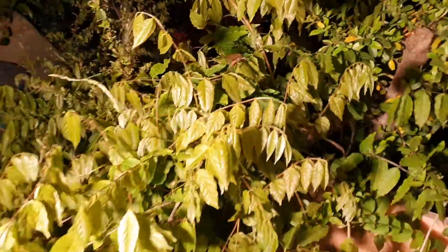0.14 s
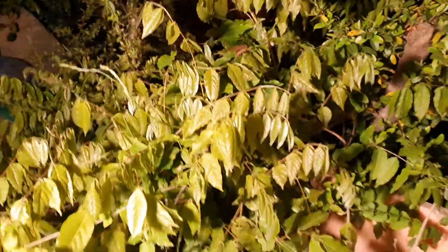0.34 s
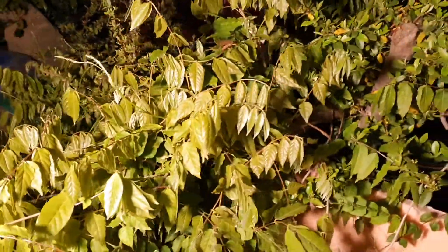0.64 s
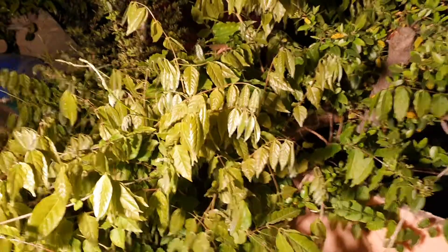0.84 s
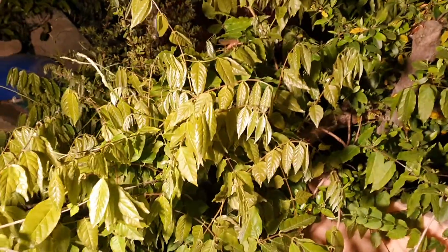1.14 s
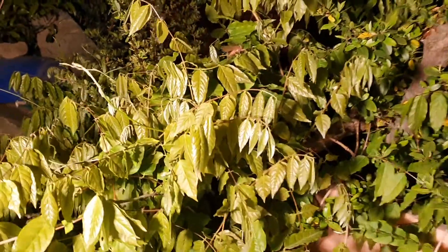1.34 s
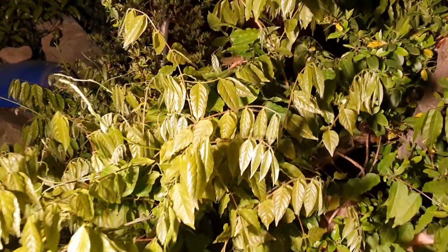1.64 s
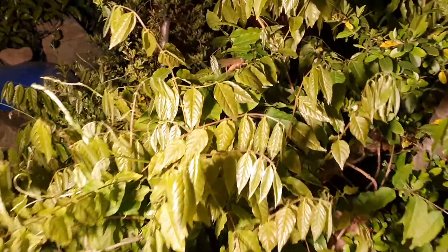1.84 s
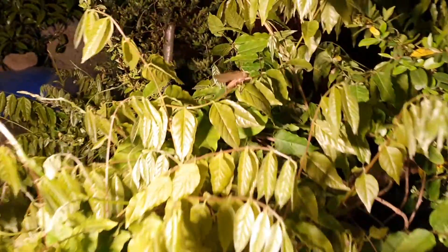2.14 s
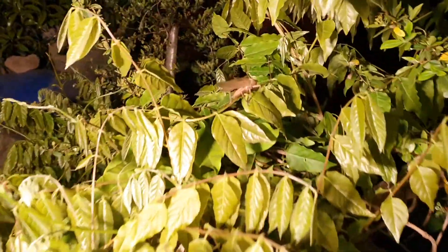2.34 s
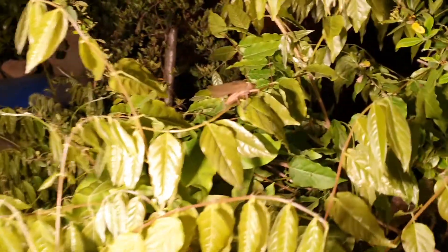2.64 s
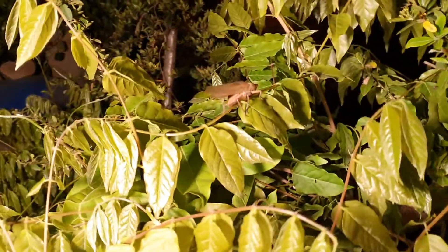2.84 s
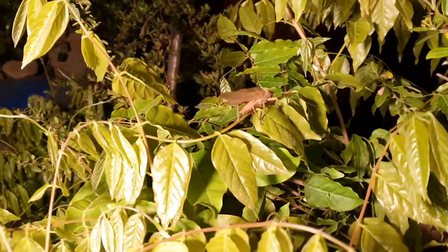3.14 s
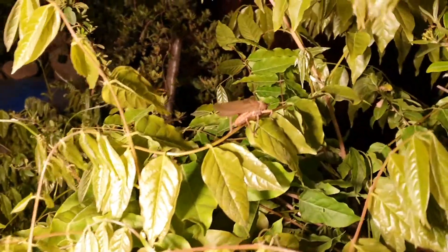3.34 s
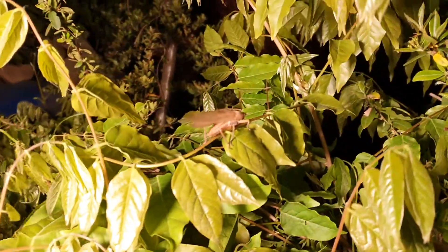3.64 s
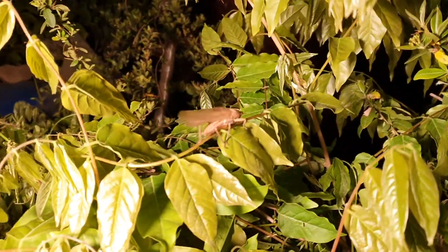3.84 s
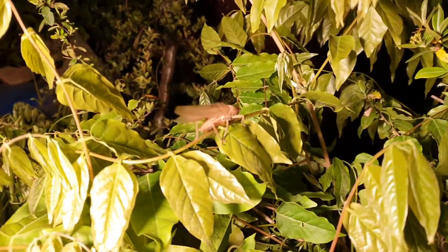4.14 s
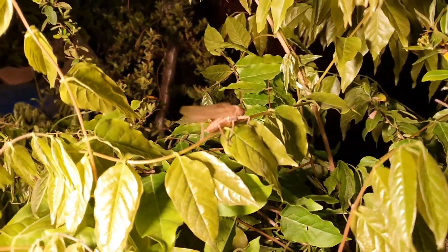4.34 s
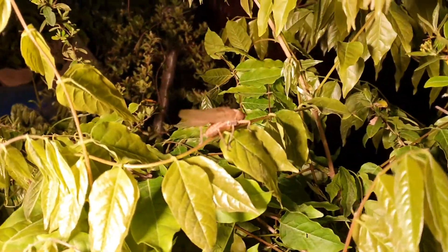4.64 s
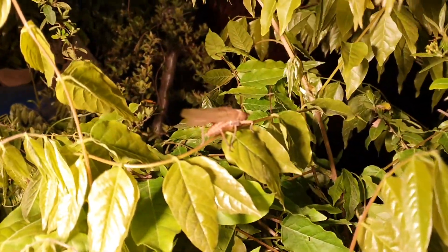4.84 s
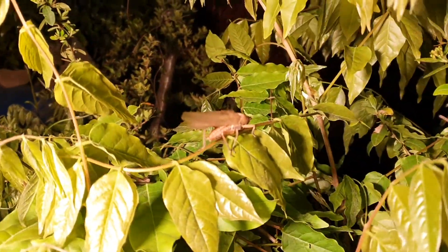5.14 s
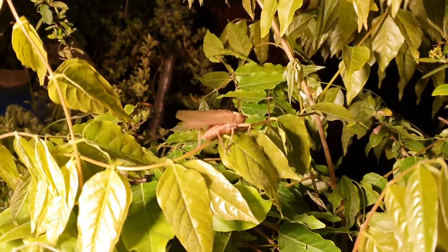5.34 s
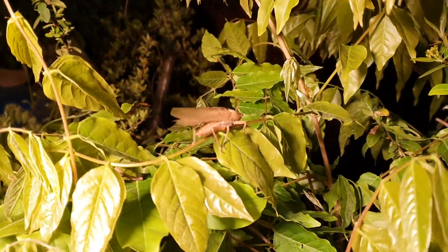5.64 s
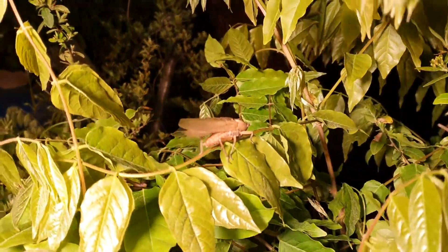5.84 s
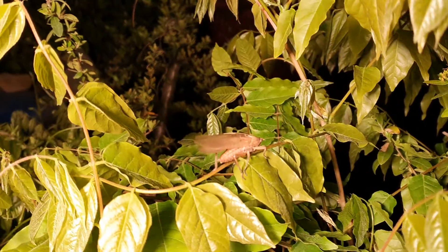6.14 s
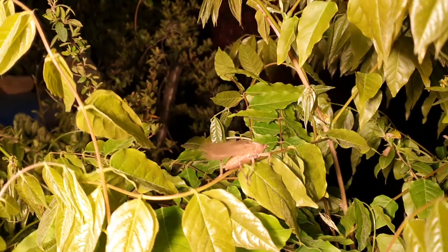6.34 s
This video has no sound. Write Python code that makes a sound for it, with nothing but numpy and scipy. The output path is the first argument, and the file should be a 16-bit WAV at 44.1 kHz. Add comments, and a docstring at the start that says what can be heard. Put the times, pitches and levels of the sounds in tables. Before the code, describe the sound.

Outdoors at night, a katydid in a leafy bush sings one unbroken, very high, sizzling buzz, its strokes so rapid they blur into a rough whine. The stereo microphone moves closer early on, and the sound shifts slightly to the left as leaves tint its brightness. Just after five seconds it stops instantly, leaving a quiet low traffic rumble, far engine hum and faint insect hiss.

```python
"""A katydid buzzes in a leafy bush at night while a camera moves closer; the buzz then ends abruptly.
Each wing stroke drags a scraper along a toothed file: a few slips over the first half of a falling
chirp, whose octave rings the wing. The wingbeat hums softly; leaves scatter and shade the buzz. Behind
it distant traffic and engines murmur, far insects hiss, and a few dry ticks and a crackle are heard."""
import sys
import numpy as np
from scipy import signal
from scipy.fft import rfft, irfft, next_fast_len
from scipy.io import wavfile
from scipy.ndimage import uniform_filter1d, minimum_filter1d, map_coordinates

SR = 44100
rng = np.random.default_rng(int(sys.argv[2]) if len(sys.argv) > 2 else 0)


def put_to_file(sound):
    """Save the sound as 16-bit audio at rate SR, in the file named by the first command-line argument."""
    columns = np.atleast_2d(sound).T  # one column per channel
    safe = np.clip(columns, -1, 1)
    whole_steps = np.round(safe * 32767)
    wavfile.write(sys.argv[1], SR, whole_steps.astype(np.int16))


N = 286209
T_S = np.arange(N) / SR

# Wingbeat tempo. Each row: time in seconds, strokes per second.
TEMPO = [(0, 91.43), (2.5, 91.5), (3.2, 91.25), (4.3, 91.38), (5.17, 91.68)]
LAST_STROKE_S = 5.1642
# Strokes before STUMBLE_S start this much later: the rhythm skips ahead once.
STUMBLE_S, STUMBLE_SHIFT_S = .86, .0016
# Scraper slips, from before the bite to mid-chirp. Each row: time in ms, relative level in dB,
# timing spread in ms.
SLIPS = [(.76, -6.5, .003), (1.92, -1.5, .003), (2.7, -3.5, .008), (3.35, -3, .025), (4, -3, .06),
         (4.65, -6.5, .1)]
# Wing modes rung by the slips. Each row: frequency in Hz, relative level in dB, t60 in ms.
WING_MODES = [(9410, -0.5, 2.08), (11390, 4.5, 1.94), (12350, -3.5, 2.5), (13750, -9.5, 2.6),
              (14460, -7, 2.2)]
WING_SWELL_MS = .22
# Wing radiation. Each row: frequency in Hz, gain in dB.
RADIATION = [(5000, -56), (6400, -33), (6900, -3), (7400, 1.5), (7750, 3.5), (8300, 6), (9100, -2),
             (10000, -0.5), (11000, -1.5), (12350, -5), (13000, 1), (13550, -6.5), (14400, -0.5),
             (15250, -2.5), (15750, 2)]
# One closing stroke: the scraper bites, slows along the file and lifts off.
BITE_MS, LIFT_MS, ATTACK_MS, RELEASE_MS = 1.7, 7.7, .3, .8
# Nominal tooth rate at the bite, and time constant of its fall.
FIRST_TOOTH_HZ, SLOWING_MS = 11200, 11.8
# Stroke timing spread; period and depth (0-1) of the scraper's judder.
STROKE_JITTER_MS, JUDDER_PERIOD_MS, JUDDER_DEPTH = .03, 1.25, .3
# The octave swells as it falls through the wing's top resonance.
TONE_DB, OCTAVE_DB, OCTAVE_HZ, OCTAVE_HALF_WIDTH_HZ = -7.5, 3, 14720, 470
# Spread in force of whole strokes and single slips.
STROKE_SPREAD_DB, SLIP_SPREAD_DB = .35, 2.1
# Friction noise of scraper on file. Each row: frequency in Hz, gain in dB.
SCRAPE_COLOUR = [(6500, -4.5), (8500, -0.5), (10500, 7), (13000, 6.5), (15500, 0.5)]
# Weak rasp, late in each stroke, below the song in pitch.
RASP_PEAK_MS, RASP_SLOPE_DB_PER_MS, RASP_SPREAD_DB = 6.4, 4.2, 2.3
RASP_SWING_DB, RASP_SWINGS_PER_S = 1.8, 8
# Rasp colour. Each row: frequency in Hz, gain in dB.
RASP_COLOUR = [(3000, -45), (4300, -19), (4900, -2), (5300, -1), (5600, -2), (6100, -.5), (6450, -7),
               (7500, -40)]
# Rasp level. Each row: time in seconds, mean level against the song in dB.
RASP_DB = [(.3, -40), (1.6, -39), (3.2, -40.5), (4.5, -38.5)]
# Air pushed by the wings. Each row: multiple of the stroke rate, rms level at one metre in dB.
WINGBEAT = [(1, -62), (2, -60.5), (3, -63), (4, -67.5)]

# Song level at one metre, before shading by leaves.
SONG_DB = -11.5
# Camera to singer. Each row: time in seconds, distance in metres.
DISTANCE = [(.1, 2.29), (.6, 1.87), (1.35, 1.53), (2.3, 1.47), (3.6, 1.51)]
# Camera turning. Each row: time in seconds, singer's bearing in degrees to the left.
BEARING = [(.05, 3.2), (.35, 0.54), (.8, 1), (1.4, 0.57), (1.95, 1.7), (2.3, 3.8), (2.5, 7.1), (2.65, 10.7),
           (2.95, 10.9), (3.1, 8.7), (3.3, 10.5), (3.5, 12.9), (3.95, 17.04), (4.75, 18.2), (5.15, 16.9)]
TREMOR_DEGREES, TREMORS_PER_S = .15, 7
PORT_GAP_M, SOUND_M_PER_S = .15, 343
# Lag of right port behind left for sound from the front. Each row: frequency in Hz, phase in radians.
PORT_PHASE = [(5000, 1.5), (6300, 0.8), (7100, 0), (8200, 1.27), (9650, -0.3), (11000, -0.5), (12600, -1.5),
              (13400, -1), (15500, -0.5)]
# Near-leaf echoes, thinning as the view clears. Each row: time in seconds, dB against direct song.
LEAVES_DB = [(0, -1), (1.3, -3.5), (2.3, -5.5), (2.8, -8), (5.15, -7.5)]
LEAVES_T60_S = .032
# Single reflections at the left port. Each row: first delay in ms, last delay in ms, signed share.
LEFT_LEAVES = [(.374, .39, -.16), (.464, .52, -.14), (.678, .766, -.12)]
# The same at the right port. Each row: first delay in ms, last delay in ms, signed share.
RIGHT_LEAVES = [(.39, .382, .16), (.224, .3, -.12), (.75, .674, -.12), (.938, 1.106, -.12)]
# Centres of the song's low, middle and top bands. Each entry: frequency in Hz.
BANDS_HZ = [8000, 10700, 14700]
# Shading by leaves. Each row: time in seconds, low, middle and top band gain in dB.
SHADE = [(0, 1, 1.5, 4), (.5, -0.5, -0.6, 1.5), (1.3, -1, 1, 4), (1.85, -0.5, -0.5, 3), (2.1, 0, -0.5, 2),
         (2.4, -1, -0.5, 2), (2.8, -1.1, 3.5, 1.8), (3.45, -2.04, 4, 3.5), (4.1, -1, 2.5, 3.3),
         (5.15, -1.5, 3, 3.5)]
# Tilt between ports. Each row: time in seconds, left minus right in low, middle and top band in dB.
BALANCE_DB = [(0, 0, 0, -3), (0.5, -2, 0, -1.5), (1.3, -1, -1, -3), (1.75, -0.5, -1, -4),
              (2.1, -2.8, 0.5, -4), (2.4, -2.5, 1, 1), (2.75, -1, -1.5, 4), (3.1, 2.5, -2.5, 2),
              (3.45, 0, -0.5, 2), (3.8, 1, 1, 3), (4.4, -0.3, 3.5, 2.7), (5.15, 1.5, 2, 2.5)]

# Dry ticks. Each row: time in seconds, peak before colouring in dB.
TICKS = [(0.857, -16), (1.582, -24), (4.053, -20), (4.9185, -28), (4.94, -26), (4.962, -26), (4.9735, -26)]
# Soft crackle; its level is before colouring.
CRACKLE_S, CRACKLE_HALF_S, CRACKLE_DB, CRACKLES_PER_S = 4.945, .05, -34, 900
# Colour of ticks and crackle. Each row: frequency in Hz, gain in dB.
TICK_COLOUR = [(400, -8), (1500, -1), (6000, 2), (12000, 0)]

# Distant traffic spectrum. Each row: frequency in Hz, relative density in dB per Hz.
ROAD = [(12, -41.5), (20, -27.5), (36, -8), (53, 2.5), (101, -1.5), (150, -10), (184, -7), (250, -6.5),
        (292, -7), (334, -14.5), (532, -9), (694, -9.5), (1260, -16), (1800, -17.5), (2700, -26.5),
        (4000, -33), (5200, -45), (8800, -120)]
# Steady road levels.
RUMBLE_DB, ROAR_DB, ROAR_FLUTTER_DB = -53, -47, .75
# Swells of the road sound. Each row: loudest at seconds, half length in seconds, rumble in dB, roar in dB.
ROAD_SWELLS = [(0.246, 0.3, -61, -75), (1.542, 0.98, -55.5, -46.5), (2.849, 0.45, -50.5, -51),
               (5.95, 0.25, -51.5, -63), (6.443, 0.12, -46.5, -43)]
# Far engines. Each row: loudest at seconds, half length in seconds, pitch in Hz, glide in Hz per s,
# mean level at the loudest in dB, octave against the tone in dB.
ENGINES = [(0.777, 1, 49.1, 0.4, -51.5, -5), (1.405, 0.72, 310.5, -6, -64, -29),
           (2.933, 0.35, 299.7, -7.5, -48, -23), (3.99, 0.64, 54.16, -2.5, -54, -13),
           (6.151, 0.78, 56.1, 1.2, -48, -4)]
# Far-insect hiss spectrum. Each row: frequency in Hz, relative density in dB per Hz.
NIGHT = [(2500, -31.5), (4000, -25), (5500, -11.5), (7500, -16.5), (8600, -12), (9900, -20), (10700, -5),
         (11500, -2.5), (13200, -9), (14300, -6.5), (15200, -30), (16000, -43.5)]
# Far-insect level. Each row: time in seconds, level before throbbing in dB.
NIGHT_DB = [(5.3, -69.5), (6.1, -72.5), (6.45, -66)]
# Likeness of the two ports for distant sound. Each row: frequency in Hz, coherence (0-1).
COHERENCE = [(30, 0.93), (90, 0.87), (180, 0.87), (350, 0.78), (700, 0.65), (1400, 0.33), (2800, 0),
             (8000, 0.065)]
# Recorder's band limit, and limiter ceiling as a share of full scale.
EDGE_HZ, CEILING = 15850, .96


def katydid(slip_db=2.5, scrape_db=-18, octave_scrape_db=-10):
    """Each stroke: slips ring the wing, the slowing scraper chirps and scrapes, and a rasp peaks late."""
    start_s = stroke_starts()
    shift, haste, size, grip = rng.standard_normal((len(start_s), 4)).T[:, :, None]
    # one row of 10 ms per stroke
    index = (start_s[:, None] * SR).astype(int) + np.arange(SR // 100)
    ms = (index / SR - start_s[:, None]) * 1000 + STROKE_JITTER_MS * shift

    contact = np.clip(np.minimum((ms - BITE_MS) / ATTACK_MS, (LIFT_MS - ms) / RELEASE_MS), 0, 1)
    tooth_hz = FIRST_TOOTH_HZ * np.exp((BITE_MS - ms) / SLOWING_MS)
    ringing = 1 / (1 + ((2 * tooth_hz - OCTAVE_HZ) / OCTAVE_HALF_WIDTH_HZ) ** 2)
    speed = 1 + 0.009 * haste + 0.00723 * wander(1.8)[index[:, :1]]
    chirp = contact * file_tone(ms, tooth_hz, speed, ringing)

    scrape_gain = amp(scrape_db) + amp(octave_scrape_db) * ringing
    scrape = contact * scrape_gain * rng.standard_normal(ms.shape)
    rasp_gain_db = RASP_SPREAD_DB * grip - RASP_SLOPE_DB_PER_MS * abs(ms - RASP_PEAK_MS)
    rasp = amp(rasp_gain_db) * rng.standard_normal(ms.shape)
    slips = amp(slip_db) * slip_pulses(ms)

    # lay the strokes along the timeline
    chirp, scrape, rasp, slips = (
        np.bincount(index.ravel(), (amp(STROKE_SPREAD_DB * size) * part).ravel(), N)
        for part in (chirp, scrape, rasp, slips))
    swing = unit(chirp + colour(scrape, SCRAPE_COLOUR) + signal.oaconvolve(slips, wing())[:N])
    # the stiff wing rounds off its widest swings
    song = unit(colour(np.tanh(swing / 2.2), RADIATION))
    rasp_db = follow(RASP_DB, T_S)[0] + RASP_SWING_DB * wander(RASP_SWINGS_PER_S)
    song = song + unit(colour(rasp, RASP_COLOUR)) * amp(rasp_db)
    return song / song[:index.max()].std()  # rms 1 while singing


def stroke_starts():
    """Start times of the strokes, counted back from the last by integrating the tempo."""
    back_s = np.arange(LAST_STROKE_S, 0, -1 / SR)
    beats = np.cumsum(follow(TEMPO, back_s)[0]) / SR
    start_s = np.interp(np.arange(beats[-1]), beats, back_s)
    return start_s + STUMBLE_SHIFT_S * (start_s < STUMBLE_S)


def file_tone(ms, tooth_hz, speed, ringing):
    """Falling tone of teeth passing the juddering scraper, and its octave lifted by wing resonance."""
    # integral of the exponentially falling tooth rate
    phase = 2 * np.pi * speed * (FIRST_TOOTH_HZ - tooth_hz) * SLOWING_MS / 1000
    judder_phase = 2 * np.pi * (ms - BITE_MS) / JUDDER_PERIOD_MS - np.pi
    judder = 1 + JUDDER_DEPTH * np.cos(judder_phase + rng.standard_normal((len(ms), 1)))
    tone = amp(TONE_DB) * judder * np.sin(phase)
    return tone + amp(OCTAVE_DB) * ringing * np.sin(2 * phase)


def slip_pulses(ms):
    """Band-limited impulses where the scraper catches and slips, ever more loosely timed."""
    pulses = np.zeros(ms.shape)
    for at_ms, db, spread_ms in SLIPS:
        late, force = rng.standard_normal((len(ms), 2)).T[:, :, None]
        pulse = np.sinc((ms - at_ms - spread_ms * late) * SR / 1000)
        pulses += amp(db + SLIP_SPREAD_DB * force) * pulse
    return pulses


def wing():
    """Wing ring after one slip: damped modes swell over a few cycles and die within milliseconds."""
    ms = np.arange(SR // 100) * 1000 / SR
    modes = 0
    for k, (hz, db, t60_ms) in enumerate(WING_MODES):
        sign = (-1) ** k
        modes = modes + sign * amp(db - 60 * ms / t60_ms) * np.sin(2 * np.pi * hz * ms / 1000)
    ring = modes * (1 - np.exp(-(ms / WING_SWELL_MS) ** 2))
    return ring / abs(ring).max()


def wingbeat():
    """Low hum of wings beating the air: stroke-rate harmonics, fading within a beat of the last stroke."""
    rate = follow(TEMPO, T_S)[0]
    metres = follow(DISTANCE, T_S)[0]
    phase = 2 * np.pi * np.cumsum(rate) / SR
    singing = np.clip((LAST_STROKE_S - T_S) * rate + 1, 0, 1)
    hum = sum(amp(db) * np.sin(k * phase) for k, db in WINGBEAT)
    return np.sqrt(2) * singing / metres * hum


def bush(song, garden_db=-32, garden_t60_s=0.21, places=9):
    """Song reaching two ports with a changing lag; leaf echoes shift as the camera moves."""
    metres = follow(DISTANCE, T_S)[0]
    degrees = follow(BEARING, T_S)[0] + TREMOR_DEGREES * wander(TREMORS_PER_S)
    lag_s = PORT_GAP_M * np.sin(np.radians(degrees)) / SOUND_M_PER_S
    port_phase = read(PORT_PHASE, np.fft.rfftfreq(N, 1 / SR))
    turned = irfft(rfft(song) * np.exp(-1j * port_phase), N)
    # 4x oversampling for the moving delay
    fine = signal.resample_poly(turned * (T_S < LAST_STROKE_S + .5), 4, 1)
    right = map_coordinates(fine, [(T_S - lag_s) * SR * 4], order=3)
    direct = np.array([song, right])

    # the camera slows to a halt
    progress = np.sin(np.pi / 2 * np.minimum(T_S / LAST_STROKE_S, 1))
    leaves = 0
    for k in range(places):  # crossfade the echo patterns of successive places
        weight = np.cos(np.pi / 2 * np.clip(progress * (places - 1) - k, -1, 1))
        leaves = leaves + weight * scatter(song, LEAVES_T60_S, .0003)
    # from further off, echoes fill the gaps between strokes
    wet = amp(follow(LEAVES_DB, T_S)[0])
    near = (glance(direct, progress) + wet * leaves) / np.hypot(1, wet)
    garden = amp(garden_db) * scatter(song, garden_t60_s, 0.012)
    return shade(near + garden) * amp(SONG_DB) / metres


def glance(pair, progress):
    """Single reflections off the closest leaves; their delays change, so ripples drift in the colour."""
    fine = signal.resample_poly(pair, 4, 1, axis=1)
    out = pair.copy()
    for port, leaves in enumerate((LEFT_LEAVES, RIGHT_LEAVES)):
        for first_ms, last_ms, share in leaves:
            delay = (first_ms + (last_ms - first_ms) * progress) * SR / 1000  # samples
            out[port] += share * map_coordinates(fine[port], [(np.arange(N) - delay) * 4], order=1)
    return out


def scatter(x, t60_s, first_s):
    """Sparse echoes of random sign that die away, a different set for each port."""
    t = np.arange(SR // 5) / SR
    signs = rng.choice([-1, 1], (2, len(t)))
    sparse = rng.random((2, len(t))) < .2
    taps = signs * sparse * (t > first_s) * amp(-60 * t / t60_s)
    taps = taps / np.linalg.norm(taps, axis=1, keepdims=True)
    return signal.oaconvolve(x[None], taps, axes=1)[:, :N]


def shade(pair):
    """Leaves in the way change each band's level and tip it to one port or the other."""
    size = next_fast_len(N + 4096)
    spectrum, hz = rfft(pair, size), np.fft.rfftfreq(size, 1 / SR)
    out = 0
    for pick, db, pan_db in zip(np.eye(len(BANDS_HZ)), follow(SHADE, T_S), follow(BALANCE_DB, T_S)):
        band = irfft(spectrum * np.interp(hz, BANDS_HZ, pick), size)[:, :N]
        out = out + band * amp(db + np.array([pan_db, -pan_db]) / 2)
    return out


def ticks():
    """Coloured impulses, broad and without ring, and a soft crackle of much smaller random ones."""
    at_s, db = np.transpose(TICKS)
    clicks = np.bincount((at_s * SR).astype(int), amp(db), N)
    bell = np.exp(-((T_S - CRACKLE_S) / CRACKLE_HALF_S) ** 2)
    sparse = rng.random(N) < CRACKLES_PER_S / SR
    crackle = amp(CRACKLE_DB) * bell * rng.standard_normal(N) * sparse
    return colour(clicks + crackle, TICK_COLOUR)


def traffic(split_hz=140):
    """Low rumble and fluttering tyre roar from split noise; each swell adds power to both."""
    rumble_power, roar_power = amp(RUMBLE_DB) ** 2, amp(ROAR_DB) ** 2
    for at_s, half_s, rumble_db, roar_db in ROAD_SWELLS:
        gain = swell(at_s, half_s)
        rumble_power = rumble_power + (gain * amp(rumble_db)) ** 2
        roar_power = roar_power + (gain * amp(roar_db)) ** 2
    road = ambient(ROAD)
    rumble = signal.sosfiltfilt(signal.butter(4, split_hz, fs=SR, output="sos"), road)
    roar = unit(road - rumble) * amp(ROAR_FLUTTER_DB * wander(13))
    return unit(rumble) * np.sqrt(rumble_power) + roar * np.sqrt(roar_power)


def engine(at_s, half_s, hz, glide_hz_per_s, db, octave_db, waver_db=2, pitch_waver=0.0047):
    """Far engine: a wavering tone and its octave, gliding as it swells and fades."""
    pitch_hz = (hz + glide_hz_per_s * (T_S - at_s)) * (1 + pitch_waver * wander(5.9))
    phase = 2 * np.pi * np.cumsum(pitch_hz) / SR
    tone = np.sin(phase) + amp(octave_db) * np.sin(2 * phase)
    return np.sqrt(2) * swell(at_s, half_s) * amp(db + waver_db * wander(11.8)) * tone


def swell(at_s, half_s):
    """Gain that rises to 1 and falls again, halved at half_s from its peak."""
    return 1 / (1 + ((T_S - at_s) / half_s) ** 2)


def night(throb_db=2.5, throbs_per_s=125, unsteady=0.055, balance_db=-1.5):
    """Far insects on the left: coloured noise with an unsteady fast throb."""
    throb_hz = throbs_per_s * (1 + unsteady * wander(20))
    throb = np.sin(2 * np.pi * np.cumsum(throb_hz) / SR)
    return ambient(NIGHT, balance_db) * amp(follow(NIGHT_DB, T_S)[0] + throb_db * throb)


def ambient(points, balance_db=0.2, lead_ms=0.28):
    """Coloured distant noise, reaching the left port first and most alike in both in the bass."""
    hz = np.fft.rfftfreq(N, 1 / SR)
    left, other = rfft(rng.standard_normal((2, N)))
    same = np.clip(read(COHERENCE, hz), -1, 1)
    delay = np.exp(-2j * np.pi * hz * lead_ms / 1000)
    right = (same * left + np.sqrt(1 - same ** 2) * other) * delay
    pair = irfft(np.array([left, right]) * amp(read(points, hz)), N)
    return pair / pair.mean(0).std() * amp([[-balance_db], [balance_db]])


def amp(db):
    """Decibels to gain."""
    return 10 ** (np.asarray(db) / 20)


def unit(x):
    """Scales to rms 1."""
    return x / np.sqrt(np.mean(x ** 2) + 1e-20)


def follow(rows, at):
    """The columns of a table, interpolated along its first column."""
    first, *columns = np.transpose(rows)
    return [np.interp(at, first, c) for c in columns]


def read(points, hz):
    """A spectrum, interpolated on a log-frequency axis."""
    f, value = np.transpose(points)
    return np.interp(np.log(hz + 1), np.log(f + 1), value)


def colour(x, points):
    """Filters by a spectrum in dB."""
    size = next_fast_len(N + 4096)
    gain = amp(read(points, np.fft.rfftfreq(size, 1 / SR)))
    return irfft(rfft(x, size) * gain, size)[..., :N]


def wander(per_s, size=2048):
    """Slow random curve of rms 1, low-passed at per_s."""
    hz = np.arange(size // 2 + 1) * SR / N
    coarse = irfft(rfft(rng.standard_normal(size)) * (hz < per_s), size)
    return unit(np.interp(np.arange(N) * size / N, np.arange(size), coarse))


def scene():
    """The singer in its bush over the background of the night."""
    singer = bush(katydid()) + wingbeat()
    engines = sum(engine(*row) for row in ENGINES)
    return singer + ticks() + traffic() + engines + night()


def record(dry):
    """A fast limiter eases the tallest peaks under its ceiling; then the band limit."""
    band = signal.firwin(1023, EDGE_HZ, window=("kaiser", 9), fs=SR)[None]
    peak = abs(signal.oaconvolve(dry, band, "same")).max(0)
    gain = minimum_filter1d(CEILING / np.maximum(peak, CEILING), size=121)
    gain = uniform_filter1d(uniform_filter1d(gain, size=61), size=61)
    return signal.oaconvolve(dry * gain, band, "same")


dry = scene()
out = record(dry)
put_to_file(out)
```